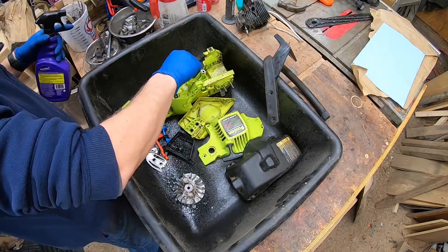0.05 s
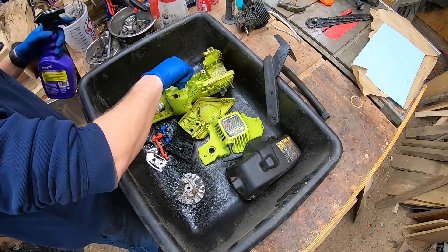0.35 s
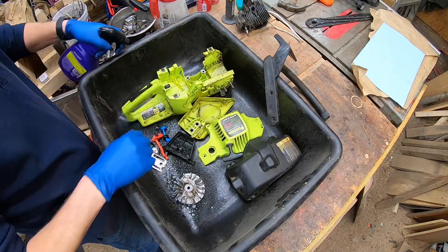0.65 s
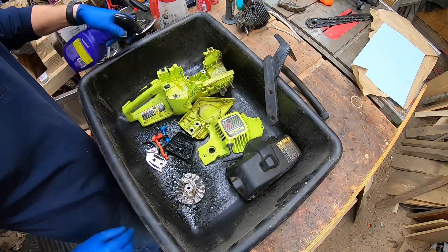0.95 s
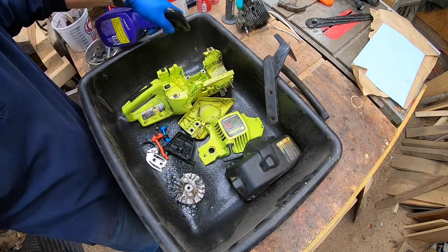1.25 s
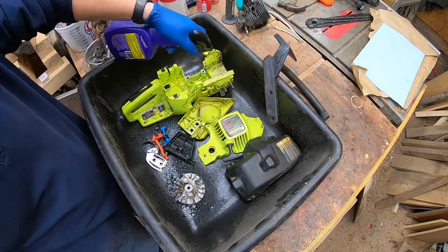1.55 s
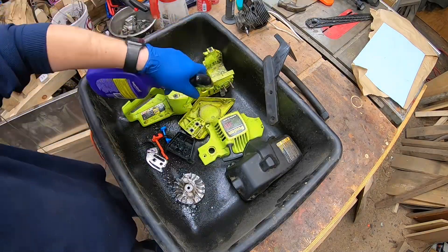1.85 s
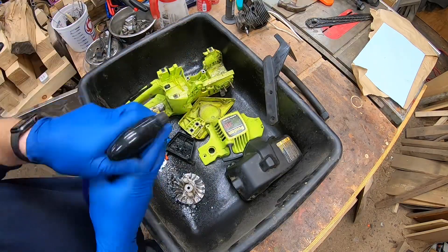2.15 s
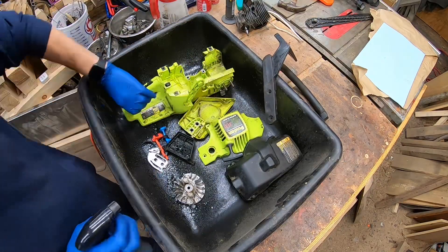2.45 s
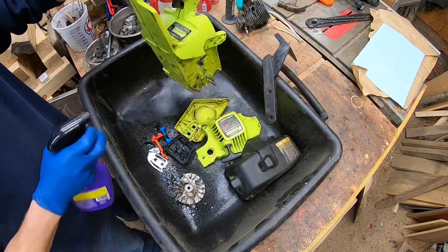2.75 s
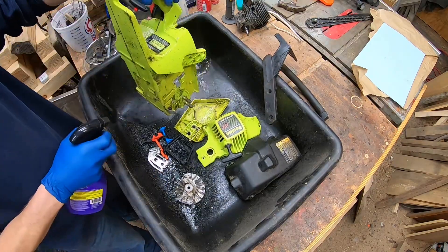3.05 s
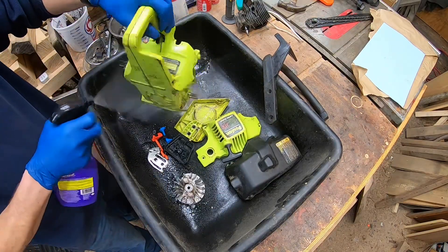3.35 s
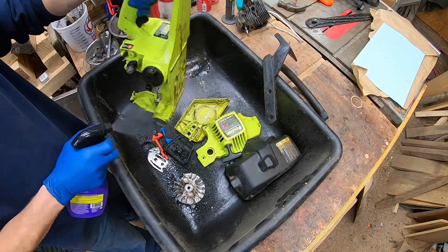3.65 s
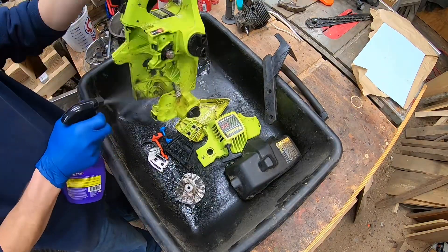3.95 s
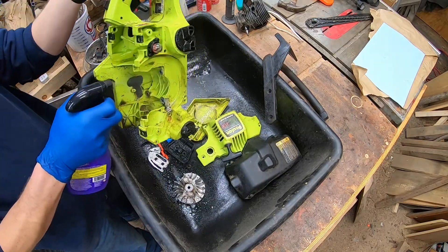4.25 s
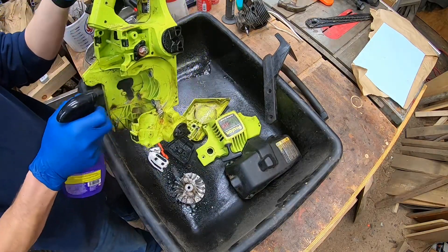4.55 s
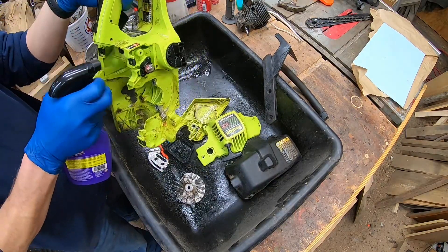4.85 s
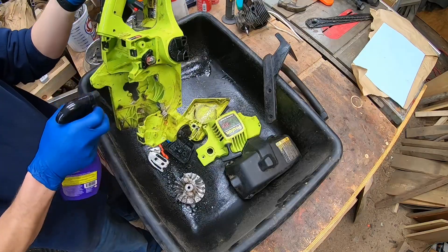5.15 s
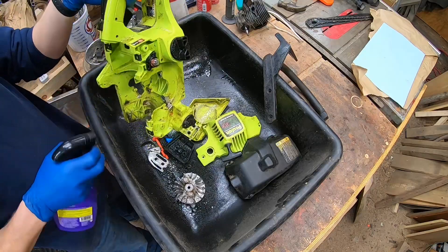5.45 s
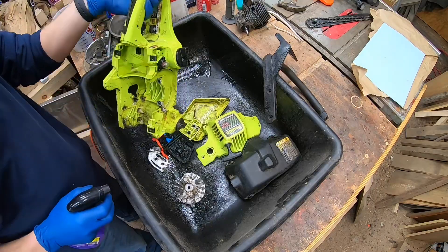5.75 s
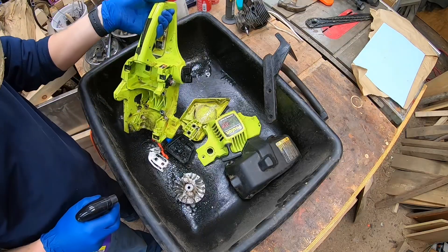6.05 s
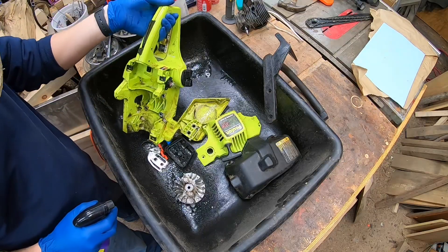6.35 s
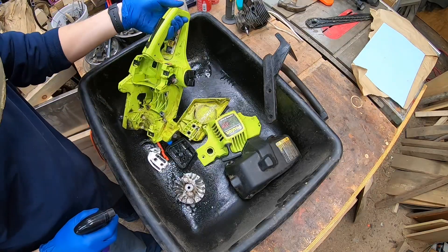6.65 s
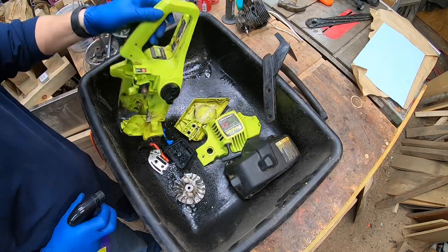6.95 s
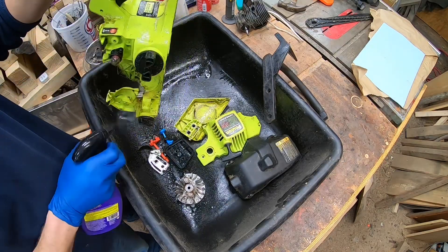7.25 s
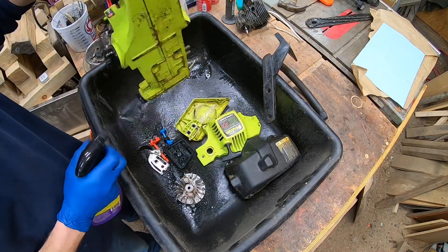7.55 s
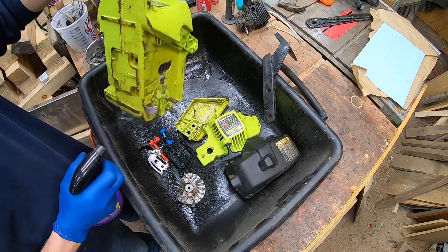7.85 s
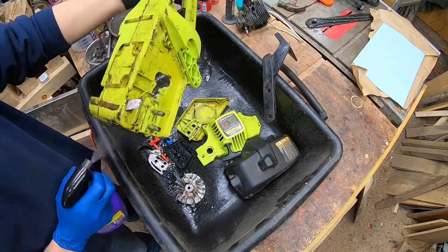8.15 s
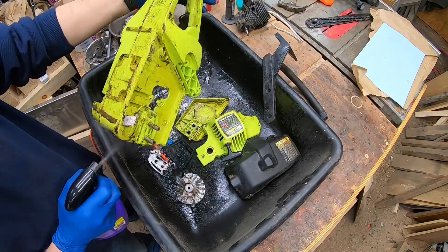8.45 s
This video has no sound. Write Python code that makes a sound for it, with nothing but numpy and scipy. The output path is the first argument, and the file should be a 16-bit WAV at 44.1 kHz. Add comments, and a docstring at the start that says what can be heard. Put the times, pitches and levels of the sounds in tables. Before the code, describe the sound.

In a small workshop, a trigger bottle is pumped rapidly, each squeeze a short wet hiss with a hollow click and tiny drops landing. A plastic housing then clatters and scrapes loudly against a plastic tub. The spraying resumes, pauses for more knocking and rubbing, and starts again. The sounds are close and fairly dry, over a steady fan with a thin whine.

```python
"""A fan with a thin whine runs throughout in a small workshop. Plastic housings click, swish and knock over
a plastic tub, then a trigger bottle sprays them with cleaner: each squeeze hisses, the trigger knocks on its
stop and drops land. Just after 2 s a housing is lifted and turned, scraping and clattering against the tub.
Spraying goes on from about 3 s, pauses for more handling around 6 to 7 s, then runs to the end."""
import sys
import numpy as np
from scipy import signal
from scipy.fft import rfft, irfft, next_fast_len
from scipy.io import wavfile
from scipy.ndimage import uniform_filter1d

SR = 44100
rng = np.random.default_rng(int(sys.argv[2]) if len(sys.argv) > 2 else 0)


def unload_audio(sound):
    """Save the sound as a 16-bit wav file, at the path given as the first command line argument."""
    columns = np.transpose(np.atleast_2d(sound))
    # keep every value between -1 and 1, then stretch to whole-number steps
    steps = np.round(np.clip(columns, -1, 1) * 32767)
    wavfile.write(sys.argv[1], SR, steps.astype(np.int16))


N = 383229
RING_TIME = np.arange(11000) / SR  # seconds since a hit
OPPOSITE = np.array([[1], [-1]])  # plus on the left, minus on the right

# Tone of the fan's rushing air: frequency_hz, level_db
FAN_TONE = [(30, -46), (130, -26.5), (240, -29.5), (310, -3), (460, 0), (610, -3.5), (710, -10.5),
            (950, -7.5), (1300, -11.5), (1950, -12.5), (3600, -20), (5200, -24.5), (7200, -33),
            (16000, -48)]
# Small plastic snaps: start_s, tick_db, ring_db, pitch_hz
SNAPS = [(0.171, -48, -62, 5740), (2.012, -54, -65, 4720), (2.189, -41, -58, 5200),
         (2.47, -44.5, -53, 3800), (3.429, -37.5, -31, 4500), (3.804, -61, -50, 2862),
         (6.129, -46, -51, 2400), (6.621, -39, -53, 2200), (8.169, -57, -67, 5900)]
# Tone of a sharp plastic crack: frequency_hz, level_db
CRACK_TONE = [(100, -67), (900, -19), (2400, 1.5), (3600, -1), (5500, -1), (8000, -8.5), (10000, -14),
              (16000, -23)]
# Notes of stiff ribs and edges: pitch_hz, level_db, decay_s (time to fade by 60 dB)
RIB_NOTES = [(2220, 11.5, 0.017), (2980, -9, 0.027), (3490, 1.5, 0.025), (4100, -13, 0.0075),
             (5350, -6, 0.012), (6330, -7, .012), (8420, 10, 0.0091), (9070, 2, .01)]
# Gloves and wet plastic brushing past: start_s, end_s, level_db
SWISHES = [(0.326, 0.374, -46), (0.413, 0.63, -55), (2.173, 2.236, -44.5), (2.24, 2.391, -54),
           (2.388, 2.49, -53.5), (3.582, 3.668, -51), (5.132, 5.22, -61), (7.06, 7.097, -66.5)]
# Tone of a fine, wet hiss: frequency_hz, level_db
MIST_TONE = [(150, -40), (500, -15), (900, -4), (1700, -5), (2800, -4.5), (3600, -4), (4500, -3),
             (6200, -0.5), (8000, -4.5), (9000, -6), (12000, -6.5), (14500, -8.5), (16000, -12.5)]
# A housing hits the tub or other parts:
# start_s, level_db, hardness (0 flat wall, 1 stiff edge), tub_pitch_hz, chatter_s, decay_s
KNOCKS = [(0.473, -37.5, .38, 440, .012, 0.025), (0.833, -30, 0.46, 159, .011, 0.085),
          (0.957, -46.5, .5, 280, 0.0062, 0.055), (1.42, -45, 0.47, 153, 0.019, 0.085),
          (2.212, -18, 0.25, 132, 0.0058, .1), (2.223, -20, 0.5, 180, .018, .08),
          (2.252, -22, 0.27, 205, .026, 0.084), (2.517, -38, 0.37, 130, .01, 0.094),
          (2.580, -25.5, 0, 347, 0.0055, 0.033), (2.589, -27.5, 0.68, 255, 0.026, .09),
          (2.701, -38.5, 0.35, 186, 0.0077, 0.08), (2.715, -32.5, 0.5, 224, .014, 0.051),
          (2.821, -33, .35, 208, 0.015, .06), (2.864, -40.5, 0.37, 260, .01, .06),
          (3.938, -34.5, 0.45, 190, 0.016, .11), (4.062, -33, 0.46, 225, 0.0028, 0.043),
          (4.071, -27.5, .33, 230, .007, .1), (4.102, -39, .55, 230, .012, 0.062),
          (4.802, -44, 0.58, 180, .01, .09), (4.9, -39.5, 0.54, 80, .02, 0.059),
          (5.061, -40.5, 0.5, 78, 0.023, 0.091), (6.127, -37, 0.66, 300, .004, .04),
          (6.824, -30.5, 0.56, 169, 0.0085, .055), (6.838, -27, 0.75, 170, .008, 0.039),
          (6.875, -41.5, .98, 300, .004, .05), (6.891, -26.5, 0.67, 285, .012, 0.095),
          (6.944, -29.5, 0.97, 310, .011, 0.055), (7.227, -34.5, 0.05, 242, 0.0034, 0.072),
          (7.601, -35, .0, 250, 0.0038, 0.08)]
# Notes of the tub and of a housing's thin shell: pitch_hz, level_db, decay_s
TUB_NOTES = [(77.4, 6, 0.12), (105, 3.5, 0.12), (125, 5, 0.25), (162, -3, 0.27), (198, -11, 0.28),
             (225.2, 1, 0.29), (292.6, 1.5, 0.2), (333, -1, 0.15), (405, 1, 0.086)]
SHELL_NOTES = [(454, 2, 0.23), (491.4, 2.5, 0.24), (616, -14, 0.12), (715, -3, 0.074), (913, 0.5, 0.054),
               (1051, -5.5, 0.2), (1121, -5, 0.12), (1444, 4.5, 0.038), (1577, -1, 0.098),
               (1876, -26, 0.093), (2044, 2, 0.031)]
# Tone of the tub's thud and of the shaken shell: frequency_hz, level_db
THUD_TONE = [(15, -42), (35, -16), (55, -1), (110, 2.5), (300, 13), (450, -16), (900, -12), (4000, -67)]
SHELL_TONE = [(40, -36), (200, -13), (420, 8), (720, -1), (1050, 1), (1600, -0.5), (2400, -6.5), (3600, -9),
              (8000, -50)]
# Runs of squeezes, timed by the trigger hitting its stop:
# first_stop_s, last_stop_s, stroke_s, hiss_db, knock_db
SQUEEZE_RUNS = [(0.804, 0.936, 0.064, -47.5, -43), (1.138, 1.557, 0.05, -45.5, -42.5),
                (1.710, 1.985, .052, -46.5, -40.5), (2.910, 2.910, 0.07, -48.5, -41.5),
                (3.028, 3.281, .045, -48.5, -40), (3.411, 4.288, .05, -47.5, -39),
                (4.412, 4.822, .038, -48, -41), (4.968, 5.122, 0.044, -49, -39.5),
                (5.395, 5.395, 0.066, -51, -45), (7.275, 7.275, .058, -52.5, -47),
                (7.437, 7.892, 0.066, -49, -42.5), (8.075, 8.517, .058, -50, -42),
                (8.717, 8.717, .042, -45.5, -44)]
# Squeezes where the trigger barely touches its stop: time_s
SOFT_STOPS = [5.395, 7.275, 7.59, 8.22]
# Tone of a tap on the bottle: frequency_hz, level_db
BOTTLE_TONE = [(40, -35), (130, -36.5), (260, -9), (390, 5), (560, -1), (800, -10.5), (1500, -5.5),
               (2300, -5), (3300, -14), (5000, -7.5), (9000, -14), (16000, -23)]
# Notes of the bottle and its trigger: pitch_hz, level_db, decay_s
BOTTLE_NOTES = [(392, 0.5, 0.064), (507, 5, 0.064), (596, -6.5, 0.076), (1460, -7, 0.025), (2267, 1.5, .03),
                (5170, 2, 0.016)]
# Plastic sliding on plastic: start_s, end_s, shell_db, rasp_db
RUBS = [(1.429, 1.528, -50, -54), (2.122, 2.244, -52, -53), (2.203, 2.302, -26, -37),
        (2.501, 2.664, -40, -38), (2.658, 2.797, -38.5, -47.5), (4.143, 4.211, -48, -55),
        (4.459, 4.554, -47.5, -55.5), (6.086, 6.159, -41, -59), (6.14, 6.28, -52, -61.5),
        (6.42, 6.55, -47.5, -62.5), (6.739, 6.845, -51.5, -50), (6.789, 6.941, -35, -41),
        (7.72, 7.819, -48.5, -57)]
# Stereo width of near and far sounds: frequency_hz, width_db (side minus middle)
NEAR_WIDTH = [(60, -10), (380, -41), (700, -20), (1300, -8.5), (2400, -5), (5000, -9), (8000, -21.5),
              (10500, -5.5), (15000, 2)]
FAR_WIDTH = [(100, 5), (380, -10.5), (700, -17), (1300, -1.5), (5000, -1), (8000, -13.5), (10000, -0.5),
             (15000, 1.5)]
# Tone of the room's echo: frequency_hz, level_db
ROOM_TONE = [(100, -9.0), (500, 0.5), (3000, -2.0), (8000, -4), (16000, -0.5)]
# How the two channels differ in tone: frequency_hz, left_minus_right_db
BALANCE = [(400, 0), (1000, -1), (1700, 1.5), (5000, 1), (8000, 1), (12000, -3), (15000, -2)]


def undb(db):
    """Turn decibels into a number to multiply by."""
    return 10 ** (np.asarray(db) / 20)


def add(out, start_s, x):
    """Mix x into out from start_s on."""
    i = max(int(start_s * SR), 0)
    out[:, i:i + x.shape[-1]] += x[..., :max(N - i, 0)]


def gain_at(hz, curve):
    """Read the gain of a (frequency_hz, level_db) curve at hz."""
    curve_hz, db = np.transpose(curve)
    return undb(np.interp(np.log(hz + 1), np.log(curve_hz), db))


def shade(x, curve):
    """Turn each frequency of x up or down along a curve."""
    n = next_fast_len(x.shape[-1], real=True)
    gain = gain_at(np.arange(n // 2 + 1) * SR / n, curve)
    return irfft(rfft(x, n) * gain, n)[..., :x.shape[-1]]


def colour(x, tone):
    """Give x a tone; white noise keeps its power."""
    n = 2 * next_fast_len(x.shape[-1] // 2 + 1024, real=True)
    gain = gain_at(np.arange(n // 2 + 1) * SR / n, tone)
    cepstrum = irfft(np.log(gain / np.sqrt(np.mean(gain ** 2))))
    # this fold makes the filter ring after a hit, never before it
    cepstrum[1:n // 2] *= 2
    cepstrum[n // 2 + 1:] = 0
    return irfft(rfft(x, n) * np.exp(rfft(cepstrum)), n)[..., :x.shape[-1]]


def favour(tone, centre_hz, slope_db):
    """The spot touched favours one pitch; each octave away from it loses slope_db."""
    return [(hz, db - slope_db * abs(np.log2(hz / centre_hz))) for hz, db in tone]


def noise(force, tone, width=NEAR_WIDTH, grain_db=0):
    """Stereo noise whose loudness follows force; grain_db makes it gritty."""
    size = undb(grain_db * np.minimum(rng.exponential(size=len(force)), 6))
    mid, side = rng.standard_normal((2, len(force))) * force * size / np.sqrt(np.mean(size ** 2))
    return colour(mid + OPPOSITE * shade(side, width), tone)


def wander(n, rate_hz):
    """A smooth random drift, mostly between -1 and 1."""
    step = max(int(SR / rate_hz), 1)
    return uniform_filter1d(np.repeat(rng.standard_normal(n // step + 1), step)[:n], step)


def fade(decay_s):
    """A struck thing dies away, by 60 dB in decay_s."""
    return np.exp(-np.log(1000) * RING_TIME / decay_s)


def at_level(x, db):
    """Give a hit the energy of 20 ms of steady sound at db."""
    return x * undb(db) / np.sqrt(np.sum(x.mean(0) ** 2) / (SR * .02))


def ring(notes, centre_hz, octaves):
    """A struck thing rings with its own notes; those near centre_hz are favoured."""
    out = 0
    for hz, db, decay_s in notes:
        size, detune, lag = rng.standard_normal(3)
        weight = undb(db + 1.6 * size) * np.exp(-.5 * (np.log2(hz / centre_hz) / octaves) ** 2)
        stereo_phase = OPPOSITE * lag * gain_at(hz, NEAR_WIDTH)
        envelope = fade(decay_s) * np.minimum(RING_TIME * hz, 1)  # builds up over one cycle
        wave = np.sin(2 * np.pi * hz * (1 + 0.0052 * detune) * RING_TIME + stereo_phase)
        out = out + rng.choice([-1, 1]) * weight * envelope * wave
    return out


def fan(drone_hz=464, whine_hz=1674):
    """Rushing air, a wavering low drone and the motor's thin whine."""
    t = np.arange(N) / SR
    air = noise(undb(-53 + .5 * wander(N, 3)), FAN_TONE, FAR_WIDTH)
    drone = np.sin(2 * np.pi * drone_hz * t + 2.54 * wander(N, 14))
    drone *= undb(-63 + 4.3 * wander(N, 6))
    whine = np.array([np.sin(2 * np.pi * whine_hz * t + 0.83 * wander(N, 5.4)) * undb(db)
                      for db in (-60, -63)])  # left, right
    return air + np.sqrt(2) * (drone + whine)


def snaps():
    """Stiff edges flick past each other: a dry tick and a brief ring of the ribs."""
    out = np.zeros((2, N))
    for start, tick_db, ring_db, hz in SNAPS:
        tick = noise(fade(0.028), favour(CRACK_TONE, hz, slope_db=6.5))
        add(out, start, at_level(tick, tick_db))
        add(out, start, at_level(ring(RIB_NOTES, hz, octaves=0.77), ring_db))
    return out


def swishes():
    """Light, wet sliding makes only a fine, bright hiss."""
    out = np.zeros((2, N))
    for start, end, db in SWISHES:
        push = np.sin(np.linspace(0, np.pi, int((end - start) * SR)))
        add(out, start, noise(push, favour(MIST_TONE, 8600, slope_db=2), grain_db=2) * undb(db))
    return out


def chatter(length_s, rate_hz=600, bounce=0.75):
    """One contact, then uneven bounces that grow weaker."""
    hits = np.zeros(int(length_s * SR) + 2)
    count = int(length_s * rate_hz) + 1
    at = rng.integers(1, len(hits), count)
    strength = bounce * (1 - .5 * at / len(hits)) * rng.uniform(0.55, 1, count)
    hits[at] = strength * rng.choice([-1, 1], count)
    hits[0] = 1
    return hits[None]


def knocks(give_s=0.0017, settle_s=0.1):
    """Each knock booms the tub, rings the housing's thin shell and cracks where they touch."""
    out = np.zeros((2, N))
    pan = undb(-0.5 * OPPOSITE)  # a little to the right
    # the heavy tub floor is slow to give way; the housing settles on it and stops the boom
    give = (1 - np.exp(-RING_TIME / give_s)) * np.exp(-(RING_TIME / settle_s) ** 2)
    for start, db, hardness, tub_hz, chatter_s, decay_s in KNOCKS:
        # a flat hit booms the tub; a harder one rings the shell higher and cracks more
        shell_hz = 452 * 2 ** (1.95 * hardness)
        tub_db = db + 1.5 - 29.5 * hardness ** 2
        crack_db = db - 16.5 + 18.5 * hardness
        hits = chatter(chatter_s)
        boom = at_level(ring(TUB_NOTES, tub_hz, octaves=0.54) * give * fade(8 * decay_s), 0)
        thud = at_level(noise(fade(1.07 * decay_s) * give, favour(THUD_TONE, tub_hz, slope_db=2)), -5)
        # a few clear notes stand out from a blur of many; a firm grip damps them all
        blur = at_level(noise(fade(decay_s), favour(SHELL_TONE, shell_hz, slope_db=5.5)), 0)
        clear = at_level(ring(SHELL_NOTES, shell_hz, octaves=0.93) * fade(4 * decay_s), -2)
        crack = noise(fade(0.01) + undb(-14) * fade(0.067), CRACK_TONE)
        add(out, start, at_level(boom + thud, tub_db))
        add(out, start, pan * at_level(signal.fftconvolve(blur + clear, hits), db))
        add(out, start, pan * at_level(signal.fftconvolve(crack, hits), crack_db))
    return out


def squeezes(period_s=.14, soft_db=-16):
    """The hand pumps evenly, no two squeezes quite alike: gives start_s, stop_s, hiss_db, knock_db."""
    for first, last, stroke, hiss_db, knock_db in SQUEEZE_RUNS:
        for stop in np.linspace(first, last, round((last - first) / period_s) + 1):
            slow, firm = rng.standard_normal(2)
            is_soft = any(abs(stop - s) < period_s / 2 for s in SOFT_STOPS)
            start = stop - stroke * (1 + .03 * slow)
            yield start, stop, hiss_db, knock_db + 0.65 * firm + soft_db * is_soft


def spray(cutoff_s=0.0067, mist_s=0.05, mist_db=-13):
    """Pressure builds into a hiss, the trigger knocks the hollow bottle, the pump sucks itself full."""
    out = np.zeros((2, N))
    for start, stop, hiss_db, knock_db in squeezes():
        stroke = stop - start
        since_stop = np.maximum(RING_TIME - stroke + 0.00062, 0)
        pressure = np.clip(RING_TIME / (.5 * stroke), 0, 1) ** 0.92
        shutoff = np.exp(-since_stop / cutoff_s) + undb(mist_db) * np.exp(-since_stop / mist_s)
        jet = pressure * shutoff / (1 + undb(mist_db))
        refill = undb(-16) * np.exp(-.5 * ((RING_TIME - stroke - .042) / 0.02) ** 2)
        sputter = undb(.7 * wander(len(RING_TIME), 257))
        hiss = noise((jet + refill) * sputter, MIST_TONE) * undb(hiss_db + 3)
        add(out, start - .002, hiss)
        # the tub wall throws the hiss back from a different distance each time
        add(out, start - .002 + rng.uniform(.0004, .002), .3 * hiss)
        tap = at_level(noise(fade(0.062), BOTTLE_TONE), 0)
        hollow = at_level(ring(BOTTLE_NOTES, 1000, octaves=2.4), -2)
        add(out, stop, at_level(signal.fftconvolve(tap + hollow, chatter(.005)), knock_db))
        add(out, stop - .03, at_level(droplets(), hiss_db - 4))
        # the trigger takes up its slack with a lighter tap
        slack_db = min(knock_db, hiss_db + 7.5) - 13
        add(out, start, at_level(noise(fade(0.023), BOTTLE_TONE), slack_db))
    return out


def droplets(count=24, typical_hz=4400, decay_s=0.015, delay_s=0.041):
    """Drops land on wet plastic, each a tiny ping of its own pitch."""
    out = 0
    for late, size, pitch, place in rng.standard_normal((count, 4)):
        t = np.maximum(RING_TIME - delay_s * np.exp(.5 * late), 0)
        hz = min(typical_hz * 2 ** (.5 * pitch), SR / 3)
        ping = np.exp(-np.log(1000) * t / decay_s) * np.sin(2 * np.pi * hz * t)
        out = out + undb(2.7 * size) * ping * (1 + OPPOSITE * 0.37 * place)
    return out


def rubs(catch_db=3, catch_hz=130):
    """Sliding plastic catches and slips, shaking the shell and rasping."""
    out = np.zeros((2, N))
    for start, end, shell_db, rasp_db in RUBS:
        n = int((end - start) * SR)
        push = np.sin(np.linspace(0, np.pi, n)) * undb(catch_db * wander(n, catch_hz))
        add(out, start, noise(push, SHELL_TONE, grain_db=4) * undb(shell_db))
        add(out, start, noise(push, CRACK_TONE, grain_db=2) * undb(rasp_db))
    return out


def room(x, decay_s=0.17, echo_db=-10.5):
    """The cluttered workshop answers with a short, dull echo."""
    tail = noise(fade(decay_s) * np.clip(RING_TIME / 0.0053, 0, 1), ROOM_TONE, FAR_WIDTH)
    tail = tail / np.sqrt(np.sum(tail ** 2) / 2)
    return x + undb(echo_db) * signal.fftconvolve(x.mean(0)[None], tail)[:, :N]


def scene():
    """Spraying and handling in the room, over the fan."""
    return room(spray() + knocks() + snaps() + rubs() + swishes()) + fan()


def record(dry, low_hz=38, top_hz=15850):
    """Give left and right their own tone, then cut the deepest rumble and the highest treble."""
    stereo = np.array([shade(channel, [(hz, side * db / 2) for hz, db in BALANCE])
                       for channel, side in zip(dry, (1, -1))])
    stereo = signal.sosfilt(signal.butter(1, low_hz, "high", fs=SR, output="sos"), stereo)
    return signal.sosfilt(signal.ellip(10, .2, 70, top_hz, fs=SR, output="sos"), stereo)


dry = scene()
out = record(dry)
unload_audio(out)
```